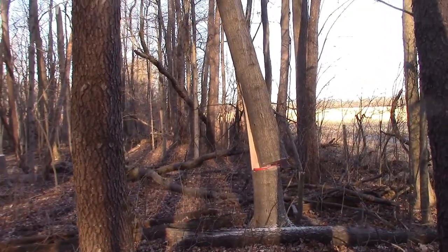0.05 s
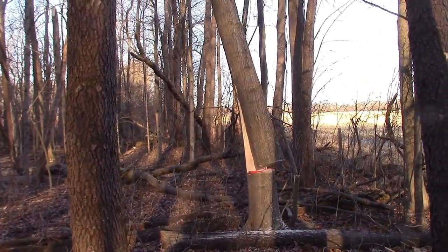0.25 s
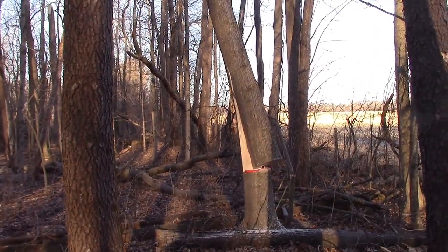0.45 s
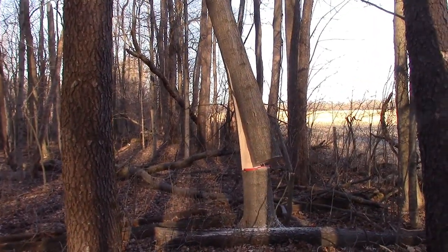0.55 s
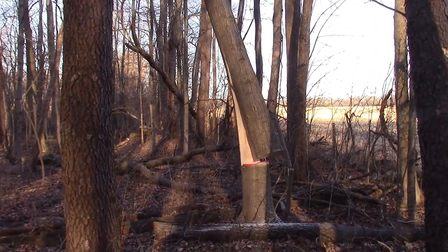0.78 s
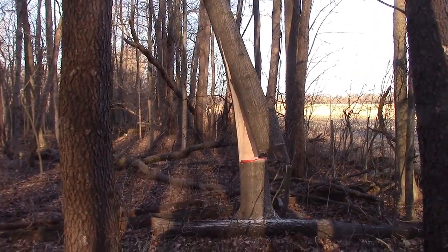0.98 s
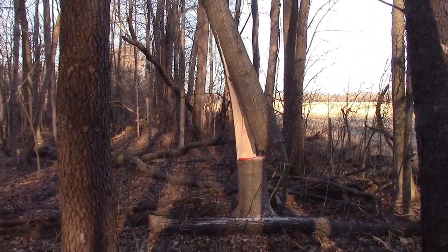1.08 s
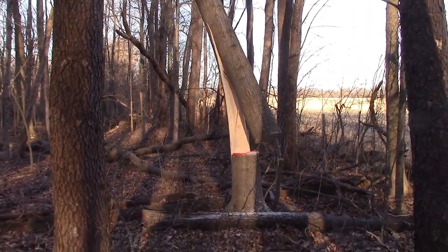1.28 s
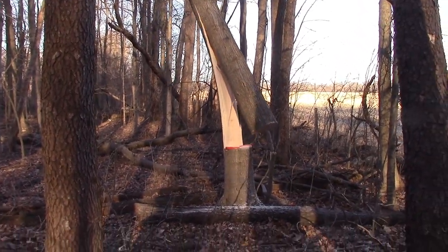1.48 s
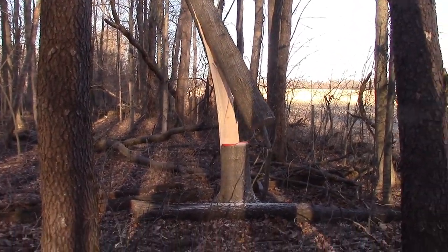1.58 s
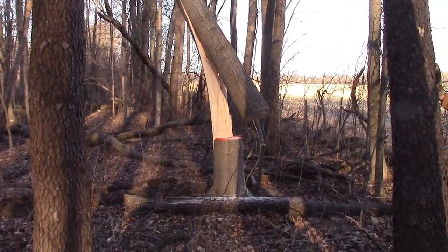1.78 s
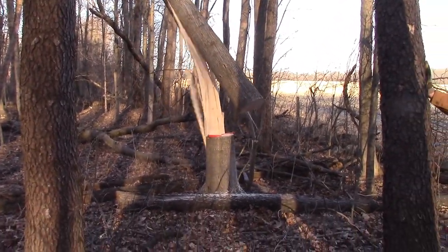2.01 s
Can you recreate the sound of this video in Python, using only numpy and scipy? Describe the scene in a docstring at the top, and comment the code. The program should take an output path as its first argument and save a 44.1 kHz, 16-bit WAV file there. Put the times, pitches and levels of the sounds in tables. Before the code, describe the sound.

Splitting tree trunk, metres away in open woodland. Tearing crackle and quick small snaps begin at once, thickening to a loud knocky crack near 0.37 s. Lighter ticks follow, then a hard cluster around 0.9 to 1.0 s, another at 1.2 s, and a sharp double crack at 1.68 s. Sparse faint ticks finish by 2 s. Trees return a short diffuse tail over very faint air; narrow stereo.

```python
"""A crackle of tearing grain, then at once sharp snaps: a half-cut tree splits lengthwise as it tips,
some metres away in bare woodland. Each snap is a short burst of breaking fibres, spiky noise that rings
a trunk knock, a slab crack and a splinter fizz. Noise pops over a smooth rustle make the finer crackle
between the snaps. The trunks around scatter it all back as lingering noise, over a faint floor of air."""
import sys
import numpy as np
from scipy import signal
from scipy.fft import rfft, irfft, next_fast_len
from scipy.io import wavfile

SR = 44100
rng = np.random.default_rng(int(sys.argv[2]) if len(sys.argv) > 2 else 0)


def nominal_scale(level):
    """Amplitude ratio for a level in decibels (scalar or array-like)."""
    x = np.asarray(level, float) / 20
    return 10 ** x


def unload_wav(signal):
    """Save mono or channel-first audio to the path in sys.argv[1] as 16-bit WAV at rate SR, clipped to [-1, 1]."""
    wavfile.write(
        sys.argv[1],
        SR,
        np.round(np.clip(np.atleast_2d(signal).T, -1, 1) * 32767).astype(np.int16),
    )


N = 90404

# Woodland air, colour of the noise floor: pitch_hz, density_db (per Hz, relative)
AIR_COLOUR = [(18, -70), (30, -41), (404, -5.5), (1130, -17.5), (1350, -13.5), (1630, -13), (3770, -33),
              (16000, -75)]
# Scatter from the trunks around, decay per band: pitch_hz, t60_s
WOODS_DECAY = [(150, 0.65), (600, 0.6), (2500, 0.57), (6000, 0.26), (12000, 0.14)]
# Stereo spread: pitch_hz, side_gain_db
SIDE_COLOUR = [(60, -29), (110, -34), (200, -37), (380, -42), (700, -32), (1290, -31), (2380, -25),
               (4400, -21), (8120, -23.5), (15000, -21.5)]
# Swell of the tearing grain: start_s, level_db (ahead of the pop and rustle gains)
TEARING_LEVEL = [(0.0, -37), (0.271, -29.5), (0.44, -44), (0.62, -45), (0.97, -38), (1.11, -41.5),
                 (1.44, -48.5), (2.05, -59.5)]
# Colour of the tearing grain: pitch_hz, density_db (per Hz, relative)
GRAIN_COLOUR = [(88, -26), (150, -4), (774, -2.5), (923, -6), (1560, -6), (1760, -9.5), (2700, -7.5),
                (9820, -17.5), (16000, -35)]
# Snaps: start_s, crack_peak_db, knock_rms_db, fizz_rms_db (rms over the first 10 ms), burst_s, note_hz
SNAP_EVENTS = [(0.0347, -23.5, -40.5, -39.5, 0.0015, 594), (0.079, -31, -36, -36.5, 0.0022, 440),
               (0.0927, -24.5, -34, -42, 0.0048, 610), (0.1093, -32, -38.5, -40.5, 0.0041, 350),
               (0.15, -41, -62, -48, 0.0027, 595), (0.179, -29, -39, -60, 0.0033, 543),
               (0.222, -23, -33, -37, 0.0025, 450), (0.2362, -30, -20, -48, 0.002, 685),
               (0.2673, -17.5, -20, -26.5, 0.0049, 286), (0.287, -23.5, -29, -38, 0.0024, 360),
               (0.304, -26, -40, -30.5, 0.0063, 383), (0.351, -43, -32.5, -44.5, 0.0059, 603),
               (0.373, -5.5, -12.5, -37.5, 0.0028, 718), (0.39, -24, -29, -56, 0.0026, 1090),
               (0.406, -37, -31.5, -81, 0.011, 795), (0.449, -45, -68, -57, 0.0022, 800),
               (0.495, -37.5, -65, -44.5, 0.0026, 790), (0.559, -38.5, -45.5, -58.5, 0.004, 770),
               (0.5884, -34, -46.5, -62, 0.004, 760), (0.6057, -38.5, -57, -50, 0.003, 710),
               (0.631, -36.5, -40, -48, 0.0036, 730), (0.6644, -37, -49.5, -45, 0.0031, 730),
               (0.6813, -47, -45, -51, 0.0038, 736), (0.707, -33.5, -49.5, -45.5, 0.0018, 704),
               (0.727, -46, -46.5, -53, 0.0018, 690), (0.766, -45, -44, -42.5, 0.002, 400),
               (0.7893, -23.5, -43, -38, 0.0022, 387), (0.869, -45, -66, -54, 0.003, 600),
               (0.8818, -31.5, -48.5, -47, 0.0018, 600), (0.8927, -26.5, -50, -42, 0.003, 600),
               (0.9068, -9, -29, -21.5, 0.002, 660), (0.9369, -18.5, -14.5, -36, 0.0006, 661),
               (0.9393, -32, -18, -49, 0.0014, 342), (0.949, -18.5, -23.5, -38, 0.0031, 364),
               (0.9607, -23, -24.5, -43, 0.0044, 600), (0.974, -20.5, -27, -43, 0.0024, 373),
               (1.0096, -23.5, -36, -36, 0.0088, 580), (1.098, -40, -39, -45, 0.007, 568),
               (1.111, -41, -38, -56, 0.0049, 570), (1.132, -36, -43, -51, 0.0025, 540),
               (1.1525, -21.5, -31.5, -41, 0.0025, 580), (1.18, -45, -38, -57, 0.0034, 605),
               (1.1981, -17, -22.5, -24.5, 0.0029, 885), (1.201, -6, -17.5, -23.5, 0.0017, 580),
               (1.2112, -20, -23.5, -38, 0.003, 230), (1.229, -19.5, -33, -34.5, 0.006, 634),
               (1.2414, -21.5, -25, -46, 0.0042, 590), (1.277, -35, -59, -48.5, 0.0028, 560),
               (1.3967, -28.5, -37, -48, 0.0039, 560), (1.455, -41, -50.5, -55, 0.0033, 540),
               (1.5393, -37.5, -58, -52, 0.0042, 560), (1.6783, -12.5, -18, -35, 0.0023, 567),
               (1.685, -6, -15, -28, 0.0034, 912), (1.7006, -29.5, -25, -40, 0.006, 580),
               (1.813, -42, -58.5, -59, 0.0018, 800), (1.905, -43, -59, -54.5, 0.0029, 610),
               (1.929, -38.5, -50, -52.5, 0.0019, 590), (2.004, -45, -60, -58.5, 0.003, 570),
               (2.04, -40.5, -58, -57.5, 0.0023, 543)]
# Broad resonances of the trunk: pitch_hz, width_hz, gain_db
TRUNK_MODES = [(144, 170, -6), (350, 157, 2.5), (580, 188, 3), (918, 210, 2.5), (1212, 370, -5)]
# Broad resonances of the split slab: pitch_hz, width_hz, gain_db
SLAB_MODES = [(1484, 368, 4), (2077, 616, 6.5), (2525, 690, 6), (3433, 906, 1)]
# Broad resonances of the splinters: pitch_hz, width_hz, gain_db
SPLINTER_MODES = [(5300, 1840, 4), (6870, 1440, 8.5), (9050, 3260, 4.5), (12000, 3400, -20)]
# How long fibres keep breaking after a burst: trunk_t60_s, slab_t60_s, splinter_t60_s
BREAKING_T60_S = (0.037, 0.025, 0.024)
# Extra hit of the first and biggest fibre: trunk_gain_db, slab_gain_db, splinter_gain_db
FIRST_FIBRE_DB = (26.5, 19.5, 25)

AIR_DB = -57.5
WOODS_SEND_DB, WOODS_DELAY_S = -16.5, 0.0088
POPS_PER_S, POP_T60_S = 400, 0.0032
POPS_DB, RUSTLE_DB = -6, -6
SPIKY_DB = 6  # size scatter of the fibre breaks
NOTE_DB, NOTE_WIDTH_HZ = 11, 66  # note of the breaking piece, lifted out of the trunk's resonances
# A snap with few splinters cracks duller: spectral slope (exponent) per dB of fizz over crack,
# and the fizz over crack that leaves the crack untilted.
TILT_PER_DB, EVEN_DB = 0.1, -20.5
LOW_CUT_HZ, TOP_HZ = 121, 16800
CEILING, KNEE = 0.59, 2.33  # full-scale limit and sharpness of the soft clip


def unit(x):
    """Scale to rms 1."""
    return x / np.sqrt(np.mean(x ** 2) + 1e-20)


def along(points, hz):
    """Read a (pitch_hz, value) curve on a log pitch axis."""
    pitch_hz, value = np.transpose(points)
    return np.interp(np.log(hz + 1), np.log(pitch_hz + 1), value)


def filtered(x, response):
    """Shape x by a complex response of frequency."""
    n = x.shape[-1]
    padded = next_fast_len(n + 8192)
    hz = np.fft.rfftfreq(padded, 1 / SR)
    return irfft(rfft(x, padded) * response(hz), padded)[..., :n]


def resonant(modes):
    """Causal response of broad resonances, summed with alternating sign."""
    def response(hz):
        total = 0
        for k, (pitch_hz, width_hz, gain_db) in enumerate(modes):
            damping = 1j * hz * width_hz
            total = total + (-1) ** k * nominal_scale(gain_db) * damping / (pitch_hz ** 2 - hz ** 2 + damping)
        return total
    return response


def woodland_air():
    """Steady coloured noise: the faint floor of the open woodland."""
    noise = rng.standard_normal(N)
    return nominal_scale(AIR_DB) * unit(filtered(noise, lambda hz: nominal_scale(along(AIR_COLOUR, hz))))


def woods(x):
    """Diffuse scatter: power lingers in each band as fresh noise, and the treble dies first."""
    delayed = np.pad(x, (int(WOODS_DELAY_S * SR), 0))[:N]
    hz, t, bands = signal.stft(delayed, SR, nperseg=256)
    decay = nominal_scale(-60 * t / along(WOODS_DECAY, hz)[:, None]) ** 2
    decay = decay / decay.sum(axis=1)[:, None]
    power = signal.fftconvolve(np.abs(bands) ** 2, decay, axes=1)[:, :len(t)]
    noise = signal.stft(rng.standard_normal(N), SR, nperseg=256)[2]
    scattered = noise / np.abs(noise).mean() * np.sqrt(np.abs(power))
    return signal.istft(scattered, SR, nperseg=256)[1][:N]


def tearing():
    """Small random noise pops on a smooth rustle, following how hard the grain tears."""
    start_s, level_db = np.transpose(TEARING_LEVEL)
    chance, size = rng.random((2, N))
    pops = (chance < POPS_PER_S / SR) * nominal_scale(-4 * np.log(size + 0.01))  # a few pops are far bigger
    pop_decay = nominal_scale(-60 * np.arange(SR // 50) / SR / POP_T60_S)
    pop_shape = signal.fftconvolve(pops, pop_decay)[:N]
    pop_noise, rustle = rng.standard_normal((2, N))
    crackle = nominal_scale(POPS_DB) * unit(pop_shape * pop_noise) + nominal_scale(RUSTLE_DB) * rustle
    colour = lambda hz: nominal_scale(along(GRAIN_COLOUR, hz))
    coloured = filtered(crackle, colour) / filtered(rustle, colour).std()
    return coloured * nominal_scale(np.interp(np.arange(N) / SR, start_s, level_db))


def trunk(note_hz):
    """Low knock: the trunk's broad resonances, lifted around each snap's own wood note."""
    note = resonant([(note_hz, NOTE_WIDTH_HZ, NOTE_DB)])
    return lambda hz: resonant(TRUNK_MODES)(hz) * (1 + note(hz))


def slab(crack_db, fizz_db):
    """Bright crack: the slab's broad resonances, tilted duller when there is little splinter fizz."""
    tilt = np.clip(TILT_PER_DB * (fizz_db - crack_db - EVEN_DB), -1, 1)
    return lambda hz: resonant(SLAB_MODES)(hz) * (1j * (hz + 1)) ** tilt


def splinters():
    """High fizz: the broad resonances of small splinters."""
    return resonant(SPLINTER_MODES)


def snaps():
    """Every burst of spiky breaks rings trunk, slab and splinters, each at its own strength."""
    # one row per snap, as columns that spread over time
    start_s, crack_db, knock_db, fizz_db, burst_s, note_hz = np.array(SNAP_EVENTS).T[:, :, None]
    t = np.arange(SR // 8) / SR
    position = (np.round(start_s * SR).astype(int) + np.arange(len(t))).ravel()
    noise, scatter = rng.standard_normal((2, len(start_s), len(t)))
    breaks = noise * nominal_scale(SPIKY_DB * scatter)
    bodies = trunk(note_hz), slab(crack_db, fizz_db), splinters()
    levels_db = knock_db, crack_db, fizz_db
    out = np.zeros(N)
    for i, (body, level_db) in enumerate(zip(bodies, levels_db)):
        fade = nominal_scale(-60 * np.maximum(t - burst_s, 0) / BREAKING_T60_S[i])
        first_fibre = nominal_scale(FIRST_FIBRE_DB[i]) * (t == 0)
        ring = filtered(breaks * fade + first_fibre, body)
        if i == 1:  # the slab crack is set by its peak
            size = np.abs(ring).max(axis=1, keepdims=True)
        else:  # knock and fizz by the rms of their first 10 ms
            size = ring[:, :SR // 100].std(axis=1, keepdims=True)
        ring = ring * nominal_scale(level_db) / size
        out += np.bincount(position, ring.ravel(), N + SR)[:N]
    return out


def scene():
    """The tree sits in the centre; a weak side of shifted tree and air and separate scatter widens it."""
    air = woodland_air()
    tree = tearing() + snaps()
    mid = tree + nominal_scale(WOODS_SEND_DB) * woods(tree) + air
    side = np.roll(tree, 9) + nominal_scale(WOODS_SEND_DB) * woods(tree) + np.roll(air, SR)
    # 1j turns the side a quarter cycle, so neither ear is favoured
    side = filtered(side, lambda hz: 1j * nominal_scale(along(SIDE_COLOUR, hz)))
    return np.array([mid + side, mid - side])


def band_limit(x):
    """A steep low-pass at the top of the band."""
    return signal.sosfilt(signal.butter(12, 16830, fs=SR, output="sos"), x)


def record(dry):
    """Second-order low cut, soft clipping of the loudest snaps, then a steep treble limit."""
    x = filtered(dry, lambda hz: (1j * hz / (LOW_CUT_HZ + 1j * hz)) ** 2)
    x = x / (1 + np.abs(x / CEILING) ** KNEE) ** (1 / KNEE)
    mix = filtered(x, lambda hz: hz < TOP_HZ)
    return band_limit(mix)


dry = scene()
out = record(dry)
unload_wav(out)
```